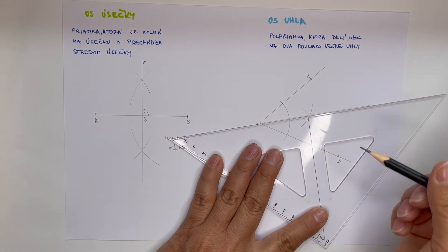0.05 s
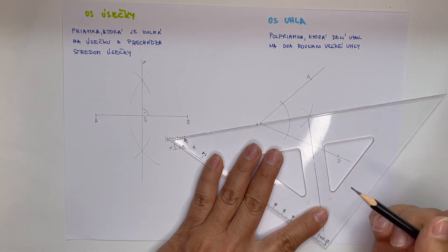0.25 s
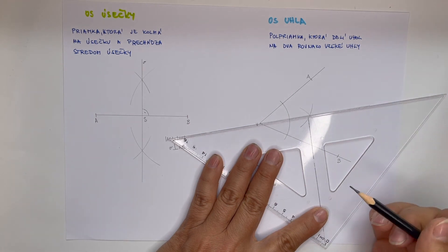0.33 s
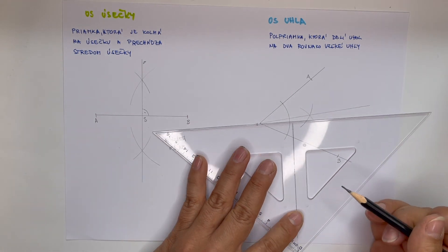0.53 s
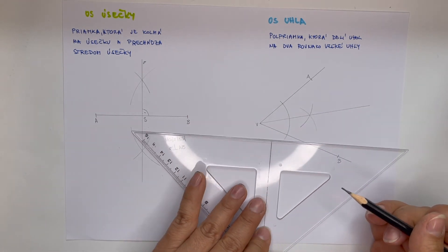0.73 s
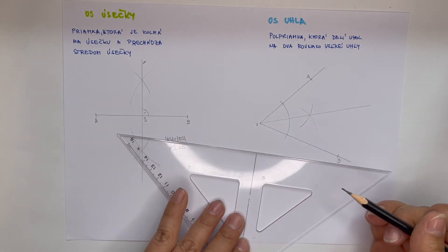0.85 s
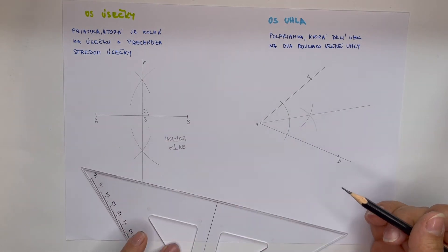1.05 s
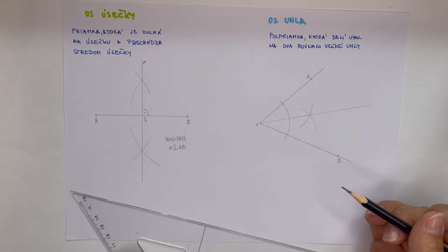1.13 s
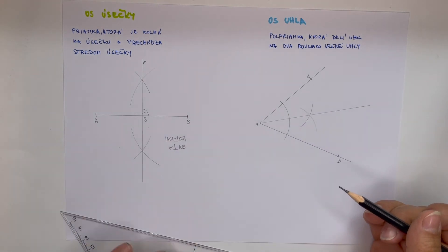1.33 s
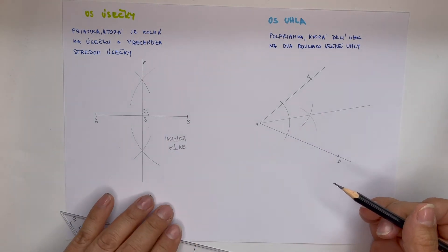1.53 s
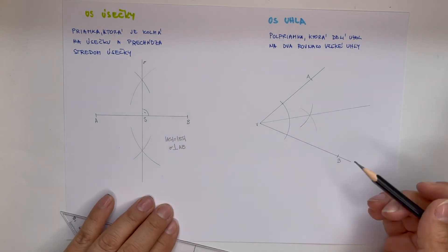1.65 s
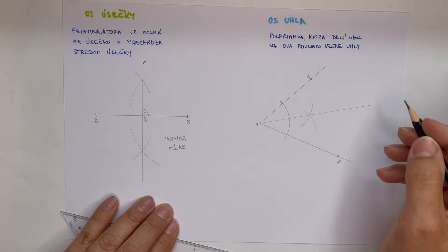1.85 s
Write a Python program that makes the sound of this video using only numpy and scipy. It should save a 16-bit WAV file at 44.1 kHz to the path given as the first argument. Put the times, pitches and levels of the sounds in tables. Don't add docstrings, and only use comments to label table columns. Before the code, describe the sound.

A plastic set square slides on paper over a wooden desk, heard close in a quiet, faintly humming room. A short scrape with plastic ticks and soft knocks comes at 0.2 s; a longer dry rasp swells from 0.35, brightest around 0.9, with a sharp tick at 1.07, and stops by 1.25. Pencil and nail taps follow at 1.38 and with dull desk knocks around 1.55, then faint scuffs and a small tap near 1.89.

```python
import sys
import numpy as np
from scipy import signal
from scipy.fft import rfft, irfft
from scipy.io import wavfile
from scipy.ndimage import uniform_filter1d

SR = 44100
rng = np.random.default_rng(int(sys.argv[2]) if len(sys.argv) > 2 else 0)


def to_linear_factor(level_db):
    exponent = np.asarray(level_db, float) / 20
    return 10 ** exponent


def transcribe(u):
    v = np.clip(np.atleast_2d(u).T, -1, 1)
    q = np.round(v * 32767).astype(np.int16)
    wavfile.write(sys.argv[1], SR, q)


N = 83790

# pitch_hz, level_db, t60_s
DESK_MODES = [(43.5, -3.5, 0.81), (106.6, 2.5, 0.22), (125, -0.5, 0.091), (199.3, -0.5, 0.14),
              (232.8, -27.5, 0.46), (335.3, -15.5, 0.11), (517, -34.5, 0.26), (868, -3, 0.047)]
# pitch_hz, likeness (0-1)
LIKENESS = [(40, .995), (150, .98), (300, .92), (600, .72), (2000, .85), (6000, .82), (8000, .96),
            (8600, .993), (16000, .993)]
RATTLE_LOW_HZ, RATTLE_HIGH_HZ = 254, 636


def read(points, hz):
    f, value = np.transpose(points)
    return np.interp(np.log(hz + 1), np.log(f + 1), value)


def evened(x):
    return x / np.sqrt(np.mean(x ** 2) + 1e-20)


def colour(x, points):
    return irfft(rfft(x) * to_linear_factor(read(points, np.fft.rfftfreq(N, 1 / SR))), N)


def butter(x, order, hz, kind):
    return signal.sosfilt(signal.butter(order, hz, kind, fs=SR, output="sos"), x)


def resonate(x, hz, width_hz):
    return signal.lfilter(*signal.iirpeak(hz, hz / width_hz, SR), x)


def resonate_twice(x, hz, width_hz):
    return resonate(resonate(x, hz, width_hz), hz, width_hz)


def slow(span_s):
    n = int(span_s * SR)
    return evened(uniform_filter1d(uniform_filter1d(rng.standard_normal(N), n), n))


def add(mix, start_s, sound):
    part = mix[round(start_s * SR):][:len(sound)]
    part += sound[:len(part)]


def fibres():
    fibres_per_s, spread_db = 13000, 0.5
    snaps = rng.standard_normal(N) * (rng.random(N) < fibres_per_s / SR)
    snaps = snaps * to_linear_factor(spread_db * np.minimum(rng.exponential(1, N), 5))
    return snaps * to_linear_factor(0.45 * slow(0.012) + 0.4 * slow(0.05))


def plastic_body(x):
    # pitch_hz, width_hz, level_db
    sheet_modes = [(1166, 100, -9), (1480, 220, -2), (2340, 490, -9.5), (2830, 850, -5), (3400, 53, -24),
                   (4940, 270, -13)]
    return sum(to_linear_factor(db) * resonate(x, hz, width) for hz, width, db in sheet_modes)


def desk_rumble():
    shake = rng.standard_normal(N) * to_linear_factor(5.4 * np.clip(slow(0.0092), -2, 2))
    rumble = sum(to_linear_factor(db) * evened(resonate(shake, hz, 3.276 / t60)) for hz, db, t60 in DESK_MODES)
    return evened(butter(rumble, 4, RATTLE_HIGH_HZ, "low"))


def drag():
    # start_s, rasp_db (follows speed), plastic_body_db (against rasp), desk_rumble_db
    pulls = [(0, -69.5, -55, -49), (.11, -75.5, -73, -138), (0.176, -64.5, 11.5, -84.5),
             (0.202, -59, -0.5, -40.5), (0.213, -72, 8, -55), (0.252, -59, -9, -59),
             (0.3, -70.5, -59, -49.5), (0.322, -54, -4, -51.5), (0.42, -47, -12, -56),
             (0.452, -43, -14.5, -55), (0.622, -42, -17.5, -59), (0.739, -46.5, -26.5, -60.5),
             (0.8, -40.5, -25, -48), (.93, -36.5, -37, -87), (1.102, -39, -47, -51.5),
             (1.169, -46.5, -37, -58.5), (1.205, -60, -32.5, -62), (1.249, -91, -23, -60)]
    # start_s, rasp_db, creak_db
    settling = [
        (1.39, -68, -100),
        (1.44, -80, -77),
        (1.5, -81, -77.5),
        (1.525, -59, -74),
        (1.591, -57, -78),
        (1.64, -68, -73.5),
        (1.72, -76, -91),
        (1.8, -70, -86),
        (1.86, -74, -83),
        (1.9, -52, -81),
    ]
    # pitch_hz, level_db
    rasp_colour = [(900, -21), (2000, -13), (3000, -5.5), (5000, -2.5), (8000, 1), (11000, 4.5),
                   (12300, -11), (15000, -3)]
    t = np.arange(N) / SR
    pull_s, rasp_db, body_db, desk_db = np.transpose(pulls)
    late_s, late_db, creak_db = np.transpose(settling)
    snaps = fibres()

    speed_db = np.interp(t, pull_s, rasp_db, right=-140)
    level = to_linear_factor(speed_db) + to_linear_factor(np.interp(t, late_s, late_db, left=-140))
    rasp = evened(colour(snaps, rasp_colour))
    plastic = to_linear_factor(np.interp(t, pull_s, body_db)) * evened(plastic_body(snaps))

    sheen = evened(signal.lfilter(*signal.butter(2, 10740, "high", fs=SR), snaps))
    sheen *= to_linear_factor(-2.5 + 1.5 * (speed_db + 42))

    creak = evened(resonate_twice(snaps, 2700, 200))
    creak *= to_linear_factor(np.interp(t, late_s, creak_db, left=-140))
    rumble = to_linear_factor(np.interp(t, pull_s, desk_db, right=-140)) * desk_rumble()
    return level * (rasp + plastic + sheen) + creak + rumble


def ticks():
    # start_s, snap_db, snap_hz, ring_db, t60_s
    plastic_ticks = [(.142, -54, 6560, -58, 0.036), (0.1679, -45, 1980, -32.5, 0.057),
                     (.179, -36, 6960, -57, 0.018), (.189, -46, 8800, -73, 0.014),
                     (.196, -50, 7000, -66, 0.017), (0.203, -35, 7500, -65, 0.0082),
                     (.234, -37.5, 7800, -65, 0.072), (.241, -46, 7000, -68, .015),
                     (0.2494, -40, 6700, -36.5, 0.061), (0.2829, -37, 1450, -33, 0.02),
                     (.2832, -38, 2970, -58, 0.044), (.2835, -41, 9000, -80, .02),
                     (.325, -43.5, 3000, -48, 0.03), (.3255, -49, 5460, -77, .02),
                     (.338, -56, 9000, -53, .02), (0.366, -35, 6000, -45, 0.044),
                     (.438, -44.5, 3200, -45, 0.018), (0.5382, -33, 2460, -38, 0.039),
                     (.5386, -31, 8450, -67, 0.022), (.617, -29, 9500, -65, 0.023),
                     (0.672, -28, 9200, -66, 0.027), (0.709, -40, 2400, -55, 0.027),
                     (.817, -61, 1210, -64, .02), (1.071, -21, 10800, -46, 0.027),
                     (1.0765, -55, 10000, -41, 0.018), (1.176, -53, 990, -58, 0.035),
                     (1.205, -55.5, 930, -75, 0.055), (1.225, -53.5, 686, -66, .06),
                     (1.36, -57.5, 860, -63, 0.041), (1.521, -49.5, 890, -60, 0.083),
                     (1.59, -55, 1570, -62, 0.2), (1.767, -54.5, 4770, -55, 0.015),
                     (1.888, -46.5, 1160, -70, 0.044), (1.894, -58, 7060, -50, .03)]
    # start_s, snap_db, snap_hz, ring_db, t60_s
    pencil_taps = [(1.381, -29, 5860, -42.5, 0.023), (1.518, -30.5, 8230, -40, 0.025),
                   (1.5437, -42, 8900, -48, 0.039), (1.548, -53, 7600, -56, 0.028),
                   (1.5622, -30, 10700, -40.5, 0.05), (1.5622, -51, 4900, -42, 0.018),
                   (1.5722, -27.5, 9300, -34, 0.01), (1.712, -72, 4870, -70, .015),
                   (1.739, -37.5, 7900, -53, 0.016), (1.739, -66.5, 4400, -48, 0.03),
                   (1.785, -61, 8600, -68, .02), (1.804, -73, 8500, -59, .02), (1.818, -72, 8400, -56, .02),
                   (1.871, -55.5, 6000, -63, 0.014), (1.889, -37, 4450, -47, 0.065),
                   (1.8885, -36.5, 9900, -83, 0.033)]
    # pitch_hz, width_hz, level_db
    corner_modes = [(1207, 290, -0.5), (1376, 158, -2), (1632, 53, -10.5), (2224, 125, -7), (3000, 280, 1),
                    (3510, 220, -7.5), (4600, 250, -8.5), (6270, 450, -8.5)]
    # pitch_hz, width_hz, level_db
    pencil_modes = [(3420, 180, -5), (4400, 320, -4), (4900, 200, -6), (5200, 660, -3), (6160, 400, -1.5),
                    (7630, 400, -1.5), (8300, 630, 5), (9050, 710, -1.5), (10660, 270, 1)]
    rise_s, crack_t60_s, strike_t60_s = 0.0002, 0.007, 0.0069
    out, t = np.zeros(N), np.arange(3000) / SR

    for hits, modes, near_db in ((plastic_ticks, corner_modes, 3), (pencil_taps, pencil_modes, 20)):
        for start_s, snap_db, hz, ring_db, t60 in hits:
            fade = to_linear_factor(-60 * t / t60) + 5.2 * to_linear_factor(-60 * t / crack_t60_s)
            crack = rng.standard_normal(len(t)) * np.minimum(t / rise_s, 1) * fade
            edge = (hz / 9000) ** 2 * np.diff(crack, prepend=0)
            snap = resonate_twice(crack, hz, 0.55 * hz) + to_linear_factor(-7) * edge

            strike = crack * to_linear_factor(-60 * t / strike_t60_s)
            ring = np.zeros(len(t))
            for f, width, db in modes:
                mode = evened(resonate(resonate(strike, f, 2 * width), f, width))
                ring += to_linear_factor(db - near_db * abs(np.log2(f / hz))) * mode
            hit = to_linear_factor(snap_db) * snap / abs(snap).max() + to_linear_factor(ring_db) * ring / abs(ring).max()
            add(out, start_s, hit)
    return out


def knocks():
    # start_s, level_db, contact_s, ring_length (factor)
    hand_knocks = [(0.205, -22.5, 0.0044, 0.16), (0.211, -26, 0.0067, 0.71), (0.233, -38.5, 0.0038, 1.3),
                   (0.249, -26, 0.005, 0.2), (0.293, -53, 0.0005, 1.1), (0.64, -41.5, 0.0063, 1.66),
                   (0.669, -49, 0.0062, 0.71), (0.782, -33.5, 0.0025, 0.6), (0.788, -36.5, 0.0015, 0.14),
                   (.805, -38.5, 0.0063, 1.03), (0.821, -38, 0.0037, 0.66), (.843, -43, 0.0023, 1.14),
                   (1.047, -42.5, 0.0073, 0.11), (1.174, -51, 0.00074, 0.33), (1.22, -60, 0.00092, 1.3),
                   (1.355, -55.5, 0.00084, 0.37), (1.5196, -31.5, 0.0021, 2.3),
                   (1.527, -30.5, 0.0024, 1.07), (1.536, -30, 0.0048, 1.02), (1.552, -33.5, 0.0043, 1.4),
                   (1.578, -42, 0.0014, 0.29), (1.636, -35, 0.0188, 0.28)]
    hard_s, hard_db_per_octave_ms = 0.0054, 3
    rattle_db, rattle_t60_s = -9.5, 0.17
    out, t = np.zeros(N), np.arange(SR // 2) / SR
    for start_s, db, contact_s, ring in hand_knocks:
        push = np.sin(np.pi * np.arange(0, contact_s, 1 / SR) / contact_s) ** 2
        tilt_db = hard_db_per_octave_ms * max(hard_s - contact_s, 0) * 1000
        modes = np.zeros(len(t))
        for hz, mode_db, t60 in DESK_MODES:
            octaves = min(np.log2(hz / DESK_MODES[1][0]), 2)
            fade = to_linear_factor(mode_db + tilt_db * octaves - 60 * t / (t60 * ring))
            modes += fade * np.sin(2 * np.pi * hz * t)
        thud = np.convolve(modes * np.cos(np.pi * t) ** 2, push)

        rattle = rng.standard_normal(len(t)) * to_linear_factor(rattle_db - 60 * t / rattle_t60_s)
        rattle = butter(rattle, 4, [RATTLE_LOW_HZ, RATTLE_HIGH_HZ], "band")
        rattle *= (0.0025 / contact_s) ** 2
        add(out, start_s, to_linear_factor(db) * (thud[:len(t)] / abs(thud).max() + rattle))
    return out


def partner(first, second, likeness):
    return irfft(likeness * first + np.sqrt(1 - likeness ** 2) * second, N)


def spread(x):
    echo_db, echo_t60_s = -11.5, 0.27
    t = np.arange(4096) / SR
    near = rfft(rng.standard_normal((2, len(t))) * to_linear_factor(-60 * t / 0.01), N)
    far = rng.standard_normal((2, len(t))) * to_linear_factor(-60 * t / echo_t60_s) * (t > 0.003)

    likeness = read(LIKENESS, np.fft.rfftfreq(N, 1 / SR))
    shift = 2 * np.pi * 6 * np.arange(N) / SR
    first, second = irfft(rfft(x) * near / abs(near), N)
    reflected = np.cos(shift) * first + np.sin(shift) * second
    right = partner(rfft(x), rfft(reflected), likeness)

    middle = butter(x, 4, [500, 7000], "band")
    echo = signal.fftconvolve(middle[None], far / np.linalg.norm(far[0]), axes=1)[:, :N]
    return np.array([x, right]) + to_linear_factor(echo_db) * echo


def air():
    # pitch_hz, level_db
    room_colour = [(20, -20.5), (45, 2.5), (180, -4), (350, -12), (900, -18.5), (2000, -26), (5000, -30.5),
                   (16000, -32)]
    left, other = rng.standard_normal((2, N))
    likeness = read(LIKENESS, np.fft.rfftfreq(N, 1 / SR)) ** 3
    pair = np.array([left, partner(rfft(left), rfft(other), likeness)])
    return to_linear_factor(-61 + 0.7 * slow(0.039)) * evened(colour(pair, room_colour))


def scene():
    return spread(drag() + ticks() + knocks()) + air()


def drop_weak_bands(x):
    # pitch_hz, floor_db (per Hz)
    band_floor = [(20, -150), (11300, -130), (12300, -124), (12700, -112), (13000, -101), (14200, -105),
                  (16000, -106)]
    pair_drop_db, pair_from_hz = -12, 1500
    top_hz, top_under_db, loud_db = 11600, -12, -86
    attack_db, attack_s = 9, 0.0015

    both = [x[0] + x[1], x[0] - x[1]]
    hz, _, z = signal.stft(both, SR, "cosine", 2048, 1024, scaling="psd")
    band = np.minimum(np.arange(len(hz)) // 16, 63)
    power = (abs(z[:, :-1]) ** 2).reshape(2, 64, 16, -1).mean(axis=2)[:, band] / 2
    above_floor = power > to_linear_factor(2 * read(band_floor, hz[band * 16 + 8]))[:, None]
    beside_partner = power > to_linear_factor(2 * pair_drop_db) * power[::-1]
    keep = above_floor & (beside_partner | (hz < pair_from_hz)[:, None])

    treble = power[:, (hz > 8000) & (hz < 11000)].mean(axis=(0, 1))
    top_stays = (power.max(axis=0) > to_linear_factor(2 * top_under_db) * treble) | (treble > to_linear_factor(2 * loud_db))
    keep &= top_stays | ((hz < top_hz) | (hz > 14000))[:, None]
    mid, side = signal.istft(z * keep, SR, "cosine", 2048, 1024, scaling="psd")[1][:, :N]
    kept = np.array([mid + side, mid - side]) / 2

    edge = np.diff(x[0], 2, prepend=[0, 0]) ** 2
    before = np.roll(uniform_filter1d(edge, 600, origin=299), 40)
    attack = uniform_filter1d(edge, 40) > np.maximum(to_linear_factor(2 * attack_db) * before, edge.mean())
    gate = np.minimum(np.convolve(attack, np.hanning(round(attack_s * SR)), "same") / 10, 1)
    return kept + gate * (x - kept)


def top_cut(x):
    return signal.sosfilt(signal.butter(12, 15910, fs=SR, output="sos"), x)


def record(dry):
    # pitch_hz, level_db
    port = [(20, 0.5), (7000, -3.5), (8500, -0.5), (10500, 6), (11200, 2.5), (12000, -7), (13200, -20.5),
            (16000, -27)]
    # pitch_hz, phase_rad
    lead = [(20, 0), (1800, 0), (2800, .8), (7800, .5), (8550, 0), (10250, -3.14), (12100, -6.28),
            (13600, -9.42), (15300, -12.56)]
    # pitch_hz, level_db
    lean = [(40, 1.1), (700, 2.2), (5500, 3.3), (7800, .8), (8400, 0)]
    hz = np.fft.rfftfreq(N, 1 / SR)
    side = np.array([[0.5], [-0.5]])
    phase = side * np.interp(hz, *np.transpose(lead))
    ports = to_linear_factor(read(port, hz) + side * read(lean, hz)) * np.exp(1j * phase)
    cut = butter(dry, 4, 47.7, "high")
    mix = drop_weak_bands(irfft(rfft(cut) * ports, N))
    return top_cut(mix)


dry = scene()
out = record(dry)
transcribe(out)
```